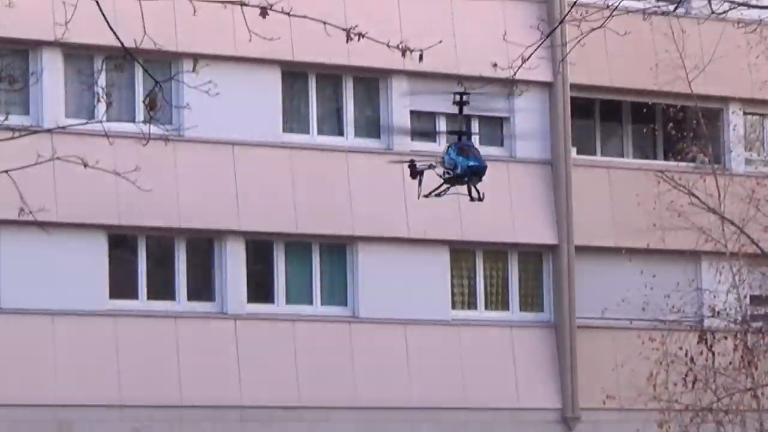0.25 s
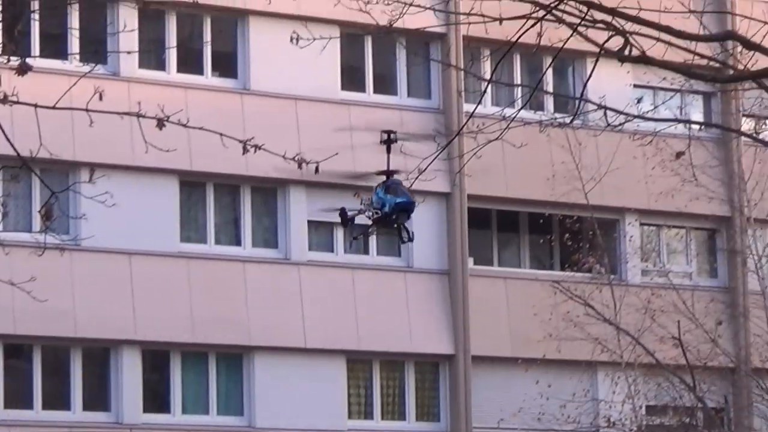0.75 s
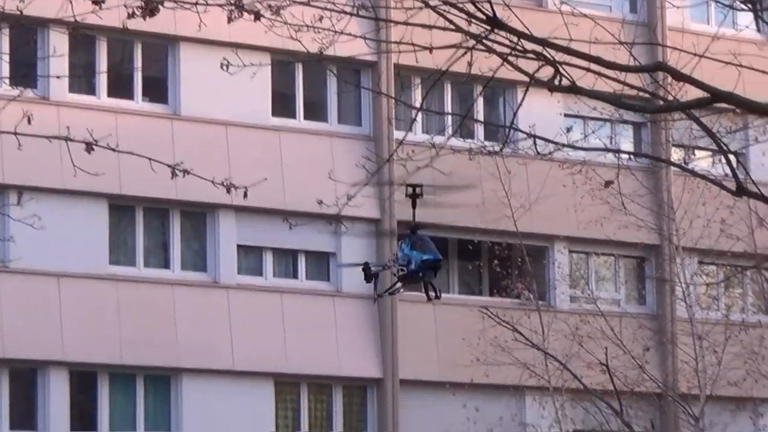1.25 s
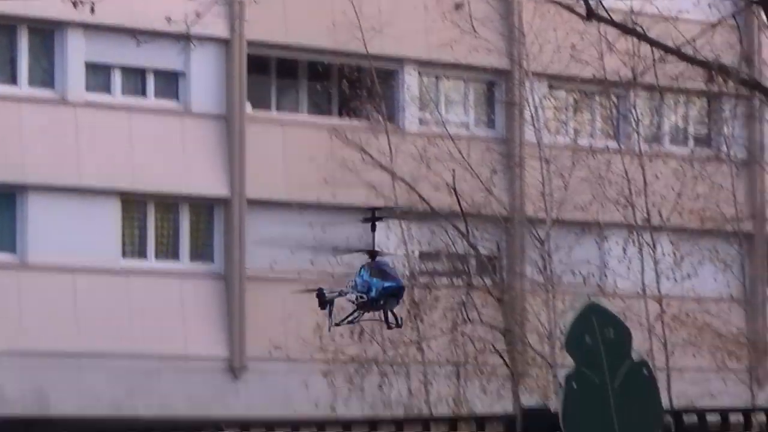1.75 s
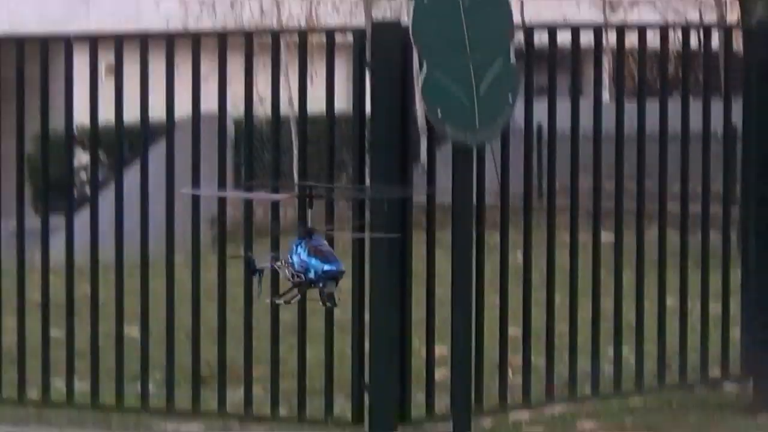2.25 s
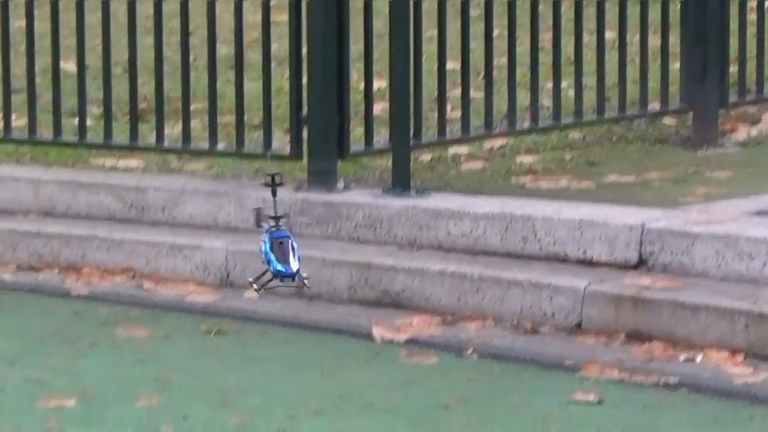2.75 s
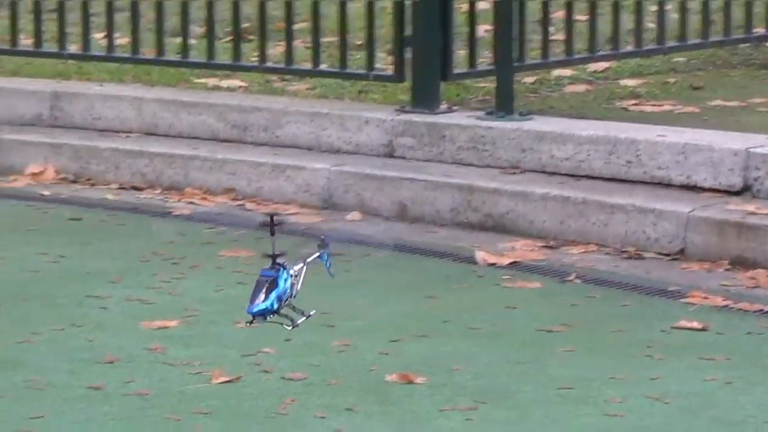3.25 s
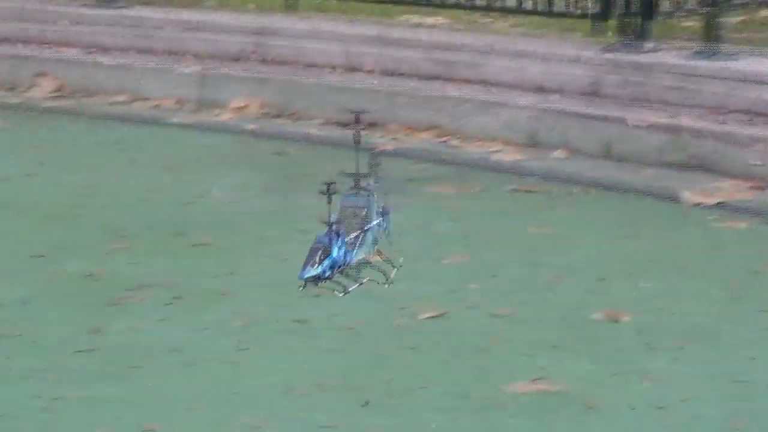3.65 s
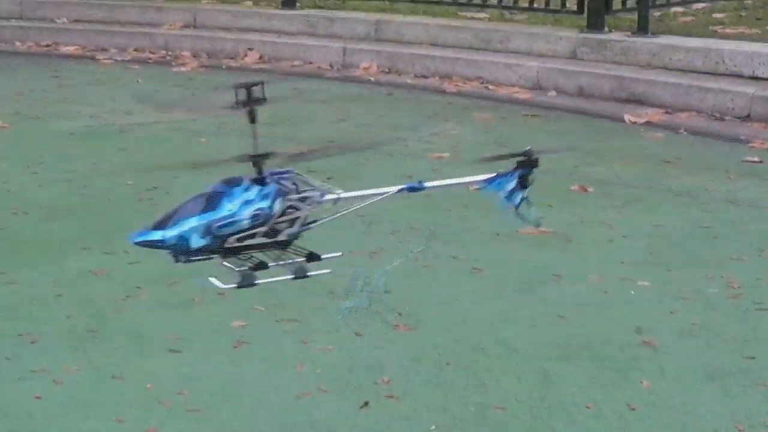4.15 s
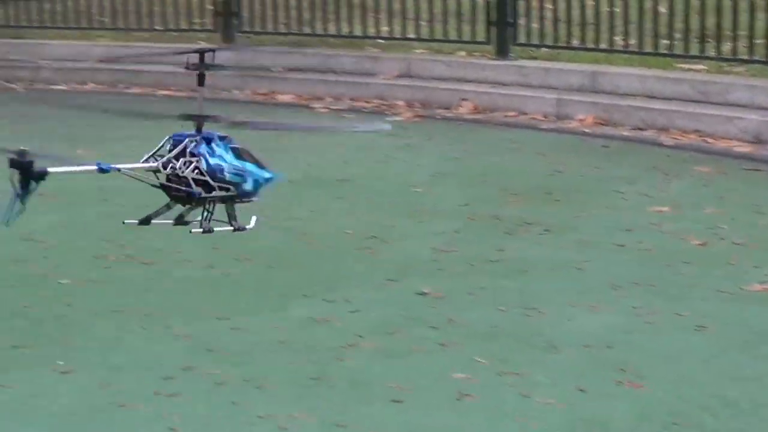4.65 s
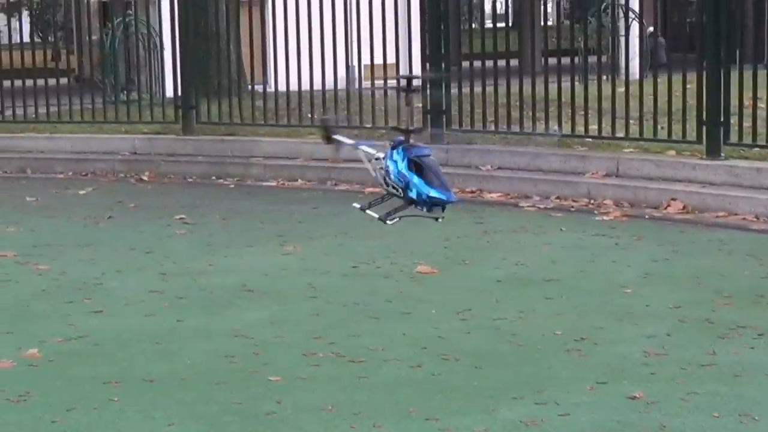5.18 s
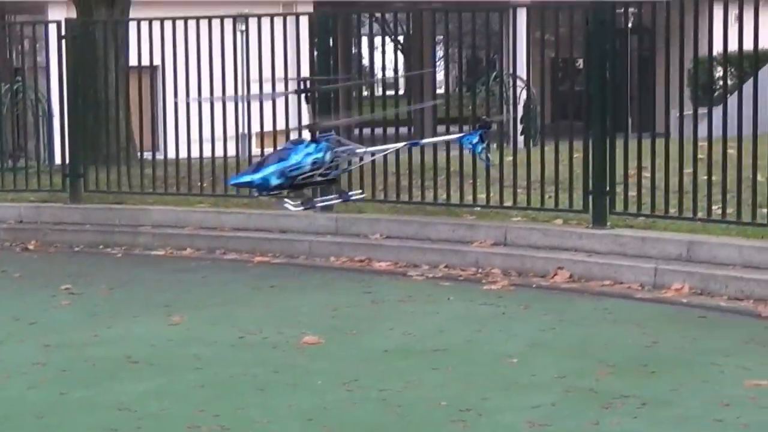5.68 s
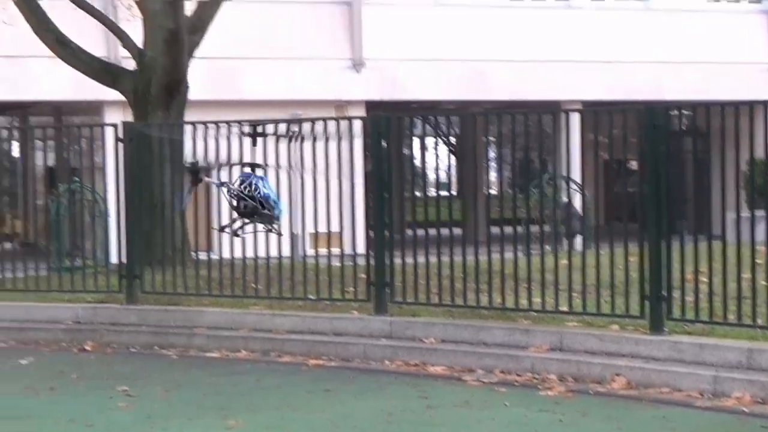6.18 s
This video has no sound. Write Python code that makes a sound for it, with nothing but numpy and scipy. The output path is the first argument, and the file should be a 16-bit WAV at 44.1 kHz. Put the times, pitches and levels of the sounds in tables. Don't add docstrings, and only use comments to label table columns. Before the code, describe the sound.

Low traffic rumble and a faint steady fan hum lie under a distant toy helicopter's thin, wavering whine and buzzing rattle. The sound glides down, rises again and drops away. Abruptly the helicopter is near, with a strong metallic gear whine, rough rattling and airy hiss that swell and change colour as it spins. Compact camera microphones outdoors, short wall and ground reflections.

```python
import sys
import numpy as np
from scipy import signal
from scipy.fft import rfft, irfft
from scipy.io import wavfile
from scipy.ndimage import uniform_filter1d

SR = 44100
rng = np.random.default_rng(int(sys.argv[2]) if len(sys.argv) > 2 else 0)


def how_loud(loudness_db):
    steps = np.asarray(loudness_db, float) / 20
    return 10 ** steps


def persist_wave(psi):
    counts = np.round(np.clip(psi, -1, 1) * 32767).astype(np.int16)
    wavfile.write(sys.argv[1], SR, np.atleast_2d(counts).T)


N = 283122
T = np.arange(N) / SR
HZ = np.fft.rfftfreq(N, 1 / SR) + 1e-3
CUT_S = 4.2492

# frequency in Hz, level in dB per Hz.
TOWN_COLOUR = [(40, -67), (90, -15.5), (150, -5.5), (250, -3.5), (400, -4), (730, -3), (1200, -8),
               (1600, -9), (2500, -30), (4000, -72)]
# frequency in Hz, likeness from 0 to 1.
TOWN_LIKENESS = [(60, .88), (170, .92), (490, .96), (1380, .8), (3940, .8)]
# frequency in Hz, level in dB under the town.
CAMERA_DRIVE = [(81.4, -35), (108.5, -21), (122.5, -22.5), (162.9, -16), (190, -23), (217.2, -15.5),
                (243.8, -14.5), (271.5, -13), (368, -16.5), (490, -21.5)]
# start in seconds, length in seconds, frequency in Hz, width in Hz, level in dB.
DISTANT_SOUNDS = [
    (1.046, 0.7, 583, 500, -40.5),
    (2.603, 0.34, 497, 400, -47),
    (3.99, 0.19, 674, 607, -39),
    (5.9, 0.38, 800, 70, -41.5),
]
TOWN_DB, DEEP_DB, FAN_DB = (-38.5, -39), (-53, -58.5), (-47, -50.5)
FADE_S, TOWN_FADE_S = (3.31, 4.464), (3.07, 5.07)
DEEP_SAG_DB_PER_S = 1.6
FAN_HZ, FAN_HIDDEN_S, FAN_HIDDEN_DB = 745.5, (2.65, 3), -19

TEETH, PINION = 75, 8
# time in seconds, frequency in Hz.
PITCH_FAR = [(0.0, 1943), (0.38, 1906), (0.6, 1861), (0.9, 1833), (1.27, 1769), (1.72, 1766), (1.86, 1790),
             (2.14, 1899), (2.76, 2030), (2.97, 2015), (3.12, 1983), (3.25, 1926), (4.24, 1932)]
# time in seconds, frequency in Hz.
PITCH_NEAR = [(4.25, 2023), (5.0, 1988), (5.64, 1983), (6.17, 2038), (6.42, 2036)]
# times per rotor turn, swing of the rattle in dB.
GEAR_RUNOUT = [(2, .3), (4, .4), (5, .7), (6, .3), (7, .5), (9.375, .5), (11, .3)]
# place on the turn from 0 to 1, width in turns, extra level in dB.
HARD_TEETH = [
    (.3, .22, 1.7),
    (.22, .018, 1.9),
    (.37, .018, 1.9),
]
# multiple of motor speed, level in dB under the canopy rattle.
MOTOR_TONES = [(5, -26), (6, -15), (7, -18), (8.75, -17), (9.5, -16), (11, -20), (14, -24), (19, -25)]
# multiple of motor speed, dB under the second mesh tone.
PINION_STRANDS = [(15, -14), (15.61, -13), (16.4, -11), (17, -8), (18, -14), (21, -8), (22, -13), (25, -12),
                  (26, -12)]
# frequency in Hz, width in Hz, level in dB.
PART_RESONANCES = [
    [(1657, 870, -3.5), (1851, 760, 1.5), (2290, 750, 2)],
    [(3590, 870, -6), (4005, 1160, 9.5)],
    [(4903, 560, 1), (5360, 1350, -4.5)],
    [(6145, 450, -5.5), (6615, 1600, 4.5)],
]
# frequency in Hz, level in dB per Hz.
BLADE_COLOUR = [(900, -37), (1500, 5), (3000, 3), (5000, 7), (7400, 10), (8200, 13), (9000, 16),
                (9700, 15.5), (10300, 18), (12000, 1.5)]

# time in seconds, nearness in dB, how squarely the gear face looks at the listener.
FLIGHT_FAR = [(0, 0, 0.31), (.3, -1.5, 0.5), (1.05, -.5, 0.033), (1.28, -.5, 0.18), (2.0, 0.45, 0.65),
              (2.5, 1.5, 0.19), (2.85, 1, 0.39), (3.02, 1.75, -1.9), (4.24, 2, -0.86)]
# level in dB, swing with the facing in dB.
PARTS_FAR = [
    (-41, 0.5),
    (-41.5, 0.3),
    (-38, 3),
    (-38.5, -1.2),
    (-40, 0.2),
]
WHINE_FAR_DB = [-63, -62.5, -51.5, -63]
# time in seconds, half length in seconds, level in dB.
GLINTS_FAR = [
    [(.25, 0.62, -50), (1.22, 0.16, -48), (2.0, 0.16, -46), (2.37, 0.15, -43.5), (2.72, 0.098, -45),
     (3.2, 0.18, -46.5), (3.92, 0.27, -43)],
    [(.3, 0.4, -44), (1.25, 0.17, -58), (1.7, 0.11, -61), (2.2, 0.17, -45.5), (2.6, 0.24, -42),
     (3.1, 0.067, -49), (3.45, 0.11, -51)],
    [(.5, 0.17, -52), (2.78, 0.34, -49), (3.17, 0.18, -52)],
    [(.1, .28, -53), (1.3, .15, -61), (1.75, .15, -56), (2.3, 0.26, -49), (2.74, 0.32, -52),
     (3.4, 0.29, -55)],
]
FACE_FAR_HZ, CAN_FAR_HZ = -30, -80
LOBE_FAR_HZ, LOBE_FAR_DB, LOBE_FACING_DB = 8220, -8.5, 1

# time in seconds, heading in turns, nearness in dB.
FLIGHT_NEAR = [(4.25, 0.0, -0.5), (4.61, 0.3, 2.3), (4.97, 0.46, 3.5), (5.34, 0.74, 1.7),
               (5.7, 0.905, -0.9), (6.06, 1.127, -2.6), (6.42, 1.44, -0.0)]
WHINE_NEAR_DB = [-50, -46, -56, -55]
# time in seconds, half length in seconds, level in dB.
GLINTS_NEAR = [
    [(4.4, .24, -32.5), (5.1, .26, -34.5), (5.85, .27, -32.5), (6.44, .1, -39)],
    [(4.49, .12, -39), (4.88, .2, -36.5), (5.35, .12, -37.5), (6.1, .17, -41), (6.45, .12, -39)],
    [(4.27, .15, -38), (4.61, .06, -44), (4.99, .18, -34.5), (5.37, .1, -41.5), (5.9, .1, -42),
     (6.22, .12, -41.5)],
    [(4.42, .12, -43), (4.8, .13, -41.5), (5.1, .15, -51), (6.0, .2, -48)],
]
# mean in dB, one-lobed swing in dB, its turns, two-lobed swing in dB, its turns.
PART_BEAMS = [
    (-35, 1.6, -.009, 2, 0.035),
    (-35.5, 3, -.046, 1.2, .17),
    (-28, 2.1, 0.059, 5.5, 0.037),
    (-29, 4, 0.07, 1.8, 0.094),
    (-31, 4.5, 0.17, 0.2, -0.00078),
]
# swing in dB, heading in turns.
STRUT_SHADE = [(0.9, -0.095), (2.5, -.087), (1.3, -0.092), (1.5, .1), (0.6, 0.12)]
# mean in Hz, one-lobed swing in Hz, its turns, two-lobed swing in Hz, its turns.
PITCH_SLIDES = [
    (-100, 48, .16, 230, .06),
    (-57.5, 186, .126, 110, -.138),
]
# swing in Hz, heading in turns.
SLIDE_STRUTS = [(110.3, -.05), (93, -.121)]
LOBE_HZ, LOBE_SWING_HZ, ROCK_S, ROCK_TOP_S = 8000, 600, 1.04, 4.33
LOBE_BEAM_DB, LOBE_STRUT = (-16, 2, -6.1, 6.5, -.153), (6.4, -0.032)

PAN_DB = (-1.9, -1.1)
# frequency in Hz, left minus right in dB.
PORT_BALANCE = [(60, -1), (220, -1.0), (820, -1.5), (3030, 0.5), (11200, 1)]
# frequency in Hz, lead of the left port in radians.
PORT_LEAD = [(10, 0), (430, -.55), (1030, -.65), (1980, -.4), (5680, -.1), (11400, 0)]
CUTOFF_HZ = 10545


def rms_one(x):
    return x / np.sqrt(np.mean(x ** 2) + 1e-20)


def either(far, near):
    return np.where(T < CUT_S, far, near)


def along(rows):
    s, *columns = np.transpose(rows)
    return [np.interp(T, s, column) for column in columns]


def at_hz(points):
    hz, value = np.transpose(points)
    return np.interp(np.log(HZ), np.log(hz + 1e-3), value)


def coloured(x, gain):
    return irfft(rfft(x) * gain, N)


def resonance(hz, width_hz):
    return 1 / (1 + 1j * (HZ - hz ** 2 / HZ) / width_hz)


def drift(rate_hz):
    return rms_one(coloured(rng.standard_normal(N), 1 / (1 + (HZ / rate_hz) ** 2)))


def tone(cycles):
    return np.sqrt(2) * np.sin(2 * np.pi * (cycles + rng.random()))


def slid(x, shift_hz):
    return np.real(signal.hilbert(x) * np.exp(2j * np.pi * np.cumsum(shift_hz) / SR))


def fade_db(start, end):
    left_over = np.clip((end - T) / (end - start), 1e-3, 1)
    return either(20 * np.log10(left_over), 0)


def town_level_db():
    return either(*TOWN_DB) + fade_db(*TOWN_FADE_S)


def traffic():
    alike = np.clip(at_hz(TOWN_LIKENESS), 0, 1)
    mid, side = rfft(rng.standard_normal((2, N)))
    air = np.sqrt(1 + alike) * mid + np.sqrt(1 - alike) * side * [[1], [-1]]
    rumble = rms_one(irfft(air * how_loud(at_hz(TOWN_COLOUR)), N))
    deep = rms_one(irfft(air * resonance(68, 73) ** 2, N))
    deep_db = either(*DEEP_DB) + fade_db(*FADE_S) - either(DEEP_SAG_DB_PER_S * T, 0)
    return how_loud(town_level_db() - 0.5 + 0.45 * drift(10.0)) * rumble + how_loud(deep_db - 3.0) * deep


def camera_drive():
    return how_loud(town_level_db()) * sum(how_loud(db + 1.6 * drift(2)) * tone(hz * T) for hz, db in CAMERA_DRIVE)


def fan():
    hidden_db = np.interp(T, FAN_HIDDEN_S, [0, FAN_HIDDEN_DB])
    level_db = either(*FAN_DB) + either(hidden_db, 0)
    return how_loud(level_db + 1.2 * drift(8)) * tone(FAN_HZ * T)


def distant_sounds():
    out = np.zeros((2, N))
    for start, length, hz, width, db in DISTANT_SOUNDS:
        swell = np.sqrt(np.sin(np.pi * np.clip((T - start) / length, 0, 1) ** 0.33))
        noise = coloured(rng.standard_normal((2, N)), resonance(hz, width) ** 2)
        out += how_loud(db) * swell * rms_one(noise)
    return out


def surroundings():
    return traffic() + camera_drive() + fan() + distant_sounds()


def lobes(heading, swing, at, count):
    return swing * np.cos(2 * np.pi * count * (heading - at))


def beam(heading, row, strut):
    mean, one, at_one, two, at_two = row
    broad = mean + lobes(heading, one, at_one, count=1) + lobes(heading, two, at_two, count=2)
    return broad + lobes(heading, *strut, count=4)


def glinting(floors_db, glints):
    levels_db = []
    for floor_db, rows in zip(floors_db, glints):
        swells = sum(how_loud(top_db) * np.exp(-((T - s) / half) ** 2) for s, half, top_db in rows)
        levels_db.append(20 * np.log10(how_loud(floor_db) + swells))
    return levels_db


def far_levels():
    near_db, facing = along(FLIGHT_FAR)
    parts_db = [db + near_db + swing_db * facing for db, swing_db in PARTS_FAR]
    levels_db = np.array(glinting(WHINE_FAR_DB, GLINTS_FAR) + parts_db) + fade_db(*FADE_S)
    return levels_db, LOBE_FAR_DB + LOBE_FACING_DB * facing


def attitude():
    heading, near_db = along(FLIGHT_NEAR)
    far_db, far_lobe_db = far_levels()
    parts_db = [near_db + beam(heading, row, strut) for row, strut in zip(PART_BEAMS, STRUT_SHADE)]
    levels_db = glinting(WHINE_NEAR_DB, GLINTS_NEAR) + parts_db
    face_hz, can_hz = [beam(heading, row, strut) for row, strut in zip(PITCH_SLIDES, SLIDE_STRUTS)]
    lobe_hz = LOBE_HZ + LOBE_SWING_HZ * np.cos(2 * np.pi * (T - ROCK_TOP_S) / ROCK_S)
    lobe_db = beam(heading, LOBE_BEAM_DB, LOBE_STRUT)
    return (either(far_db, levels_db), either(FACE_FAR_HZ, face_hz), either(CAN_FAR_HZ, can_hz),
            either(LOBE_FAR_HZ, lobe_hz), either(far_lobe_db, lobe_db))


def unevenness(turns):
    runout_db = sum(db * tone(times * turns) for times, db in GEAR_RUNOUT)
    hardness = 1 + .3 * drift(25)
    ticks_db = sum(db * np.exp(-((turns % 1 - place) / width) ** 2) for place, width, db in HARD_TEETH)
    return runout_db + hardness * ticks_db


def contact_noise(turns, uneven_db, bite=0.47):
    tooth_swell = 1 + bite * np.cos(2 * np.pi * TEETH * turns)
    return how_loud(uneven_db) * tooth_swell * rng.standard_normal(N)


def blades(turns, level_db, lobe_hz, lobe_db, uneven_db):
    hiss = coloured(contact_noise(turns, 1.1 * uneven_db, bite=0.29), how_loud(at_hz(BLADE_COLOUR)))
    lobe = coloured(contact_noise(turns, uneven_db), resonance(8000, 600) ** 2)
    lobe = slid(lobe, lobe_hz - 8000)
    return how_loud(level_db + 1.42 + 0.93 * drift(10)) * (rms_one(hiss) + how_loud(lobe_db) * rms_one(lobe))


def rattle(turns, parts_db, shifts_hz, uneven_db):
    out = 0
    for modes, db, shift_hz in zip(PART_RESONANCES, parts_db, shifts_hz):
        response = sum(how_loud(top_db) * resonance(hz, width) ** 2 for hz, width, top_db in modes)
        ringing = slid(coloured(contact_noise(turns, .7 * uneven_db), response), shift_hz)
        out = out + how_loud(db - 3.0 + 0.73 * drift(13)) * rms_one(ringing)
    return out


def motor(turns, canopy_db):
    level_db = canopy_db + .6 * (canopy_db + 33)
    motor_turns = turns * TEETH / PINION
    return sum(how_loud(level_db + db + 3.0 * drift(3)) * tone(k * motor_turns) for k, db in MOTOR_TONES)


def strands(turns, second_db):
    motor_turns = turns * TEETH / PINION
    return sum(how_loud(second_db + db + 3.5 * drift(4)) * tone(k * motor_turns + .04 * drift(20))
               for k, db in PINION_STRANDS)


def whine(turns, levels_db, uneven_db):
    teeth = TEETH * turns + .016 * drift(30) + .016 * uneven_db
    return sum(how_loud(db + .9 + .3 * uneven_db + 1.0 * drift(14)) * tone(k * teeth)
               for k, db in enumerate(levels_db, 1))


def with_echoes(direct, gears):
    echoes = rng.standard_normal((2, 8000)) * np.exp(-np.arange(8000) / (.04 * SR))
    echoes = echoes / np.linalg.norm(echoes[0])
    dull = coloured(direct - 1.3 * gears, 1 / (1 + 1j * HZ / 3000))
    return direct + how_loud(-4) * signal.fftconvolve(dull[None], echoes)[:, :N]


def helicopter():
    mesh_hz = uniform_filter1d(either(along(PITCH_FAR)[0], along(PITCH_NEAR)[0]), size=2000)
    turns = np.cumsum(mesh_hz) / SR / TEETH
    levels_db, face_hz, can_hz, lobe_hz, lobe_db = attitude()
    mesh_db, parts_db = np.split(levels_db, [len(GLINTS_FAR)])
    uneven_db = unevenness(turns)
    gears = whine(turns, mesh_db, uneven_db) + motor(turns, parts_db[0]) + strands(turns, mesh_db[1])
    still = 0 * face_hz
    body = rattle(turns, parts_db[:4], [still, still, face_hz, can_hz], uneven_db)
    hiss = blades(turns, parts_db[4], lobe_hz, lobe_db, uneven_db)
    return with_echoes(gears + body + hiss, gears)


def scene():
    pan = how_loud(either(*PAN_DB) / 2 * [[1], [-1]])
    return surroundings() + helicopter() * pan


def band_limit(x):
    return signal.sosfilt(signal.butter(12, 11820, fs=SR, output="sos"), x)


def record(dry):
    left = how_loud(at_hz(PORT_BALANCE) / 2) * np.exp(.5j * at_hz(PORT_LEAD))
    top_cut = np.clip((CUTOFF_HZ - HZ) / 60, 0, 1)
    mix = coloured(dry, np.array([left, 1 / left]) * top_cut)
    return band_limit(mix)


dry = scene()
out = record(dry)
persist_wave(out)
```